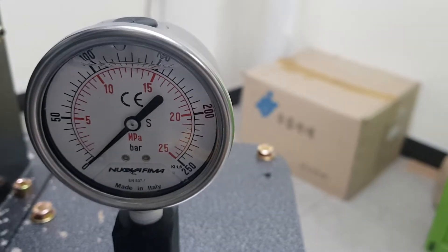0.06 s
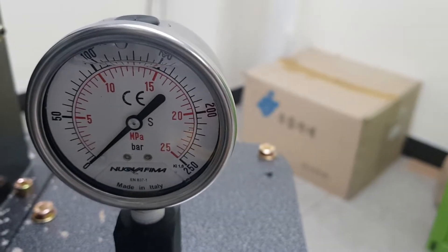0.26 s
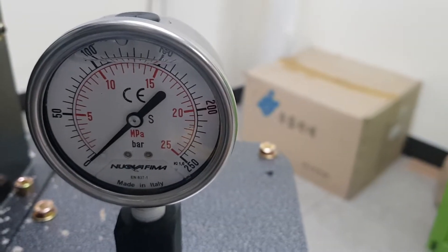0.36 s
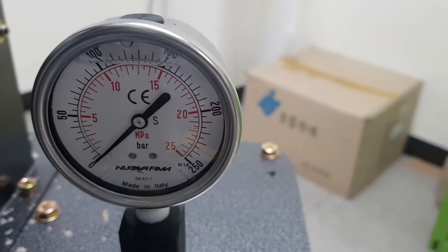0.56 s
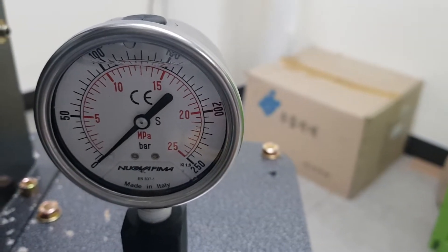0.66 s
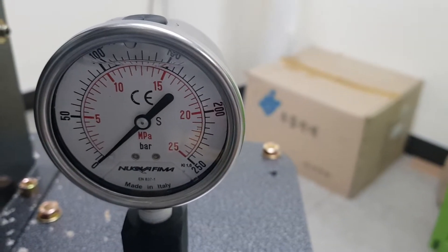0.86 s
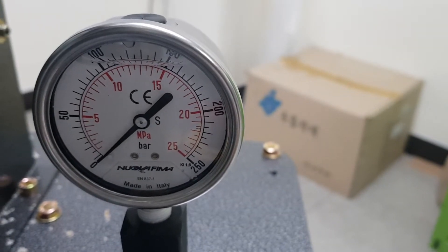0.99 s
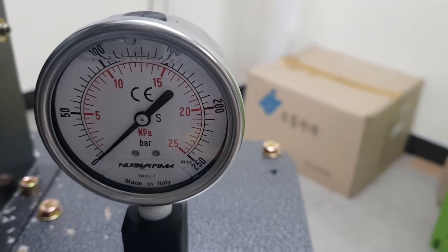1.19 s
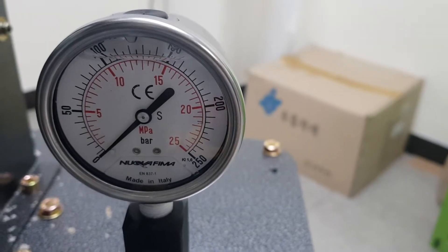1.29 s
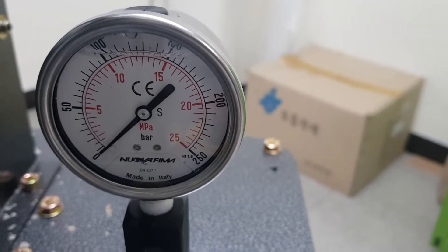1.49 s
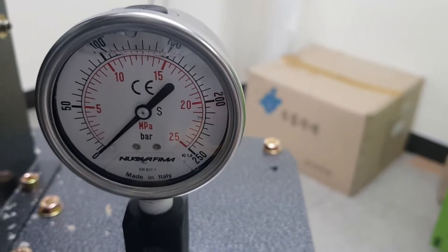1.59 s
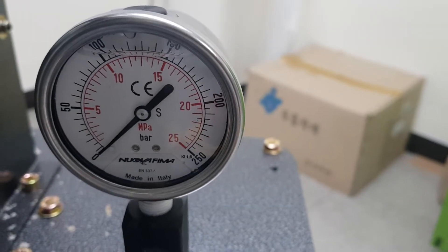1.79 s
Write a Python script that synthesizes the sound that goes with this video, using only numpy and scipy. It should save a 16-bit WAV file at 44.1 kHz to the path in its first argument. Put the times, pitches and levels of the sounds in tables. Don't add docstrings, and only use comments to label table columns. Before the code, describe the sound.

Close up indoors, sharp metallic clacks from a small hydraulic machine: a ringing bang, a boomy return with loose rattle, a dry snap, then a clunk, over faint pump whine and room hum.

```python
import sys
import numpy as np
from scipy import signal
from scipy.fft import rfft, irfft, next_fast_len
from scipy.io import wavfile
from scipy.ndimage import uniform_filter1d, map_coordinates

SR = 44100
rng = np.random.default_rng(int(sys.argv[2]) if len(sys.argv) > 2 else 0)


def volts_from_decibels(level):
    exponent = np.asarray(level, float) / 20
    return 10 ** exponent


def file_out(sig):
    cols = np.atleast_2d(sig).T
    lim = np.clip(cols, -1, 1)
    pcm = np.round(lim * 32767).astype(np.int16)
    wavfile.write(sys.argv[1], SR, pcm)


N = 81585
TIME = np.arange(N) / SR
SIDE = np.array([[.5], [-.5]])


def unit(x):
    return x / np.sqrt(np.mean(x ** 2) + 1e-20)


def along(points, hz):
    f, v = np.transpose(points)
    return np.interp(np.log(hz + 1), np.log(f + 1), v)


def wobble(rate_hz):
    knots = rng.standard_normal(int(N * rate_hz / SR) + 4)
    return map_coordinates(knots, [TIME * rate_hz])


def filtered(x, response):
    m = next_fast_len(x.shape[-1] + 8192)
    spectrum = rfft(x, m) * response(np.fft.rfftfreq(m, 1 / SR))
    return irfft(spectrum, m)[..., :x.shape[-1]]


# frequency_hz, likeness
LIKENESS = [(25, 0.29), (150, 0.89), (300, 1), (600, 0.84), (2000, 0.075)]


def pair(n):
    def mid_and_side(hz):
        angle = np.arccos(np.clip(along(LIKENESS, hz), -1, 1)) / 2
        return np.array([np.cos(angle), np.sin(angle)])

    mid, side = filtered(rng.standard_normal((2, n)), mid_and_side)
    return np.array([mid + side, mid - side])


def struck(contacts, tone, ring, ring_db, blow_db, pan_db):
    rise_s, grain_db = .001, 2
    shape = np.zeros(N)
    for start_s, level_db, clatter_s, t60_s in contacts:
        dying = np.clip(TIME - start_s - clatter_s, 0, 1) / t60_s
        shape += volts_from_decibels(level_db - 60 * dying) * np.clip((TIME - start_s) / rise_s, 0, 1)
    impacts = shape * unit(pair(N) * volts_from_decibels(grain_db * wobble(900)))
    for start_s, level_db, _, _ in contacts:
        impacts[:, round((start_s + rise_s) * SR)] += volts_from_decibels(level_db + blow_db)

    def body(f):
        rung = 0
        for k, (hz, width, db) in enumerate(ring):
            resonance = 1j * f * width / (hz * hz - f * f + 1j * f * width)
            rung = rung + volts_from_decibels(db) * resonance * (-1) ** k
        return volts_from_decibels(along(tone, f)) + volts_from_decibels(ring_db) * rung

    body_rms = np.sqrt(np.mean(np.abs(body(np.arange(1, SR // 2, 8))) ** 2))
    return volts_from_decibels(pan_db * SIDE) * filtered(impacts, body) / body_rms


# start_s, level_db, clatter_s, t60_s
THROW_HITS = [
    (.279, -30, 0.02, 0.11),
    (.290, -10, 0.012, 0.21),
]
# frequency_hz, level_db
THROW_COLOUR = [(30, -42), (150, -13.5), (520, -12), (1150, -4), (2800, -17), (7500, -22), (12700, -22),
                (16600, -28)]
# pitch_hz, width_hz, level_db
THROW_MODES = [(670, 25, -2.5), (928, 20, 4.5), (1296, 27, 2.5), (1560, 27, -1), (2070, 100, -8.5),
               (4550, 45, -7), (6580, 70, -31), (9450, 34, -9), (11300, 110, -22), (12300, 130, -8),
               (13530, 60, -23)]


def lever_throw():
    return struck(THROW_HITS, THROW_COLOUR, THROW_MODES, ring_db=-1.0, blow_db=19.0, pan_db=0.72)


# start_s, level_db, clatter_s, t60_s
RETURN_HITS = [
    (.4915, -26, 0.0027, 0.037),
    (.4945, -13.5, 0.02, 0.13),
]
# frequency_hz, level_db
RETURN_COLOUR = [(30, -45), (300, -8.5), (1500, -10), (5000, -20.5), (7200, -27.5), (12400, -18.5),
                 (16600, -34)]
# pitch_hz, width_hz, level_db
RETURN_MODES = [(680, 30, -2), (1097, 31, 2.5), (1392, 63, -7.5), (1977, 71, 0.5), (3750, 91, -7),
                (5700, 60, -6.5), (8900, 26, -29), (10900, 110, -27), (11050, 80, -15), (13200, 150, -6),
                (13260, 60, -23)]


def lever_return():
    return struck(RETURN_HITS, RETURN_COLOUR, RETURN_MODES, ring_db=-1.5, blow_db=18, pan_db=-0.39)


# start_s, level_db, clatter_s, t60_s
SLIDE_HITS = [
    (.545, -29.5, 0.013, 0.089),
    (.572, -26.5, .008, 0.067),
    (.587, -22, 0.0034, 0.04),
    (.595, -25, .005, 0.075),
    (.6215, -22.5, .008, 0.067),
    (.645, -29.5, 0.014, 0.1),
    (.672, -35.5, 0.0053, 0.092),
]
# frequency_hz, level_db
SLIDE_COLOUR = [(30, -45), (150, -2), (700, -7.5), (2400, -3.5), (3600, -11.5), (9000, -18.5),
                (13000, -19.5), (16600, -30)]
# pitch_hz, width_hz, level_db
SLIDE_MODES = [(730, 180, 2.5), (1540, 120, -15), (2410, 170, -5.5), (3100, 200, -4), (4050, 210, -11)]


def slide():
    return struck(SLIDE_HITS, SLIDE_COLOUR, SLIDE_MODES, ring_db=-5.5, blow_db=6, pan_db=0.35)


# start_s, level_db, clatter_s, t60_s
SHUT_HITS = [
    (1.4545, -13.5, 0.0059, 0.15),
    (1.505, -28.5, 0.004, 0.079),
]
# frequency_hz, level_db
SHUT_COLOUR = [(30, -22), (450, -4), (1200, -7.5), (3000, -7.5), (7000, -18), (13000, -23.5),
               (16600, -14.5)]
# pitch_hz, width_hz, level_db
SHUT_MODES = [(320, 20, -10.5), (564, 68, 1.5), (1700, 79, -2), (2270, 120, 1.5), (3390, 100, -13),
              (4060, 130, -3.5), (4780, 100, -17), (11700, 120, -8.5)]


def valve_shut():
    return struck(SHUT_HITS, SHUT_COLOUR, SHUT_MODES, ring_db=0.5, blow_db=10.5, pan_db=0.5)


# start_s, level_db, clatter_s, t60_s
CATCH_HITS = [
    (.169, -47, 0.016, .1),
    (1.109, -32, 0.0031, 0.13),
    (1.075, -36, 0.0036, .06),
    (1.215, -52, .004, 0.054),
    (1.299, -30.5, 0.0037, 0.042),
    (1.335, -38, 0.007, 0.065),
]
SNAP_HITS = [
    (1.1485, -25, 0.0026, 0.027),
    (1.1528, -10, 0.0022, 0.012),
    (1.157, -22.5, 0.0044, 0.034),
    (1.164, -26, 0.0056, 0.067),
]
# frequency_hz, level_db
CATCH_COLOUR = [(30, -59), (900, -10), (2200, -4), (5500, -17), (9000, -20.5), (16600, -23)]
SNAP_COLOUR = [(30, -48), (250, -10), (900, -13.5), (2300, -3), (4200, -14), (6500, -13), (10000, -19.5),
               (16600, -23)]
# pitch_hz, width_hz, level_db
CATCH_MODES = [(681, 42, -1.5), (1116, 36, 4), (2090, 170, -2.5), (2425, 69, 0.5), (3120, 26, -2),
               (5090, 88, 0), (6030, 150, -11.5), (7070, 300, -7.5)]


def catch():
    ticks = struck(CATCH_HITS, CATCH_COLOUR, CATCH_MODES, ring_db=-0.5, blow_db=16, pan_db=-.6)
    snap = struck(SNAP_HITS, SNAP_COLOUR, CATCH_MODES, ring_db=2.5, blow_db=8, pan_db=0.94)
    return ticks + snap


# start_s, level_db, clatter_s, t60_s
SCRAPE_HITS = [
    (.188, -42, 0.0037, 0.029),
    (.279, -33, 0.0048, .03),
    (.587, -41, 0.0024, 0.02),
    (1.442, -25, 0.019, 0.059),
]
# frequency_hz, level_db
SCRAPE_COLOUR = [(50, -70), (2200, 2.5), (7200, -9), (13300, -1), (16600, -11)]


def scrape():
    return struck(SCRAPE_HITS, SCRAPE_COLOUR, [], ring_db=0, blow_db=-3, pan_db=-.6)


def swelling_tones(tones):
    out = np.zeros(N)
    for start_s, pitch_hz, level_db, swell_s, t60_s in tones:
        t = np.clip(TIME - start_s, 0, None)
        level = volts_from_decibels(level_db - 60 * t / t60_s + 2.5 * wobble(44.1))
        swell = 1 - np.exp(-(t / swell_s) ** 2)
        out += level * swell * np.sin(2 * np.pi * pitch_hz * t)
    return out


# start_s, pitch_hz, level_db, swell_s, t60_s
BAR_TONES = [(.291, 922, -17, 0.0034, .3), (.293, 1276, -22, 0.0068, .15), (.36, 374, -35, .03, 1.2),
             (.305, 133, -24.5, 0.0095, 0.12), (.4912, 540, -20, 0.0005, 0.022),
             (.495, 1375, -12, 0.0026, 0.086), (.498, 1097, -20, 0.007, 0.14),
             (.582, 810, -18, 0.0044, 0.065), (.622, 1163, -24, 0.0025, 0.091), (.65, 840, -31, .003, .07),
             (1.09, 113.5, -32, 0.043, 0.37), (1.153, 686, -24, 0.0026, 0.061),
             (1.155, 1079, -28.5, 0.0053, 0.2), (1.154, 2070, -29, .0015, 0.041),
             (1.155, 358, -33, 0.0043, .2), (1.155, 474, -33, .004, 0.17), (1.157, 571, -36, 0.0048, 0.18),
             (1.298, 594, -32, .004, 0.11), (1.455, 326, -17, 0.002, 0.12), (1.456, 1633, -22, .002, .09),
             (1.456, 2020, -22, .0015, .05), (1.462, 3340, -27, .004, .08), (1.505, 1940, -22, .002, .045),
             (1.511, 338, -27, 0.0025, .07), (1.51, 3360, -31, .003, .08), (1.522, 780, -28, .003, .06)]


def linkage_bars():
    return swelling_tones(BAR_TONES)


# start_s, pitch_hz, level_db, swell_s, t60_s
MORE_TONES = [(.13, 239.4, -40, 0.036, 0.82), (.295, 74, -29, 0.017, .25), (0.31, 213, -23.5, 0.016, 0.14),
              (0.331, 345, -26, 0.02, 0.3), (.503, 255.2, -9, 0.019, 0.15), (0.504, 220, -23, 0.05, 0.1),
              (0.564, 263, -18.5, 0.005, 0.084), (0.576, 115, -27, 0.0083, 0.092),
              (0.613, 110.3, -17.5, 0.012, 0.15), (0.671, 85.2, -30, 0.042, 0.36),
              (1.17, 227, -32.5, 0.0079, 0.3), (1.4543, 542, -20.5, 0.0031, 0.059),
              (1.456, 170, -35, 0.0049, 0.13), (1.492, 73, -32.5, 0.024, 0.26)]


def more_struck_tones():
    return swelling_tones(MORE_TONES)


LOAD_S, LOAD_RISE_S = 1.5, .06


def pump_load():
    return np.clip((TIME - LOAD_S) / LOAD_RISE_S, 0, 1)


def tooth_phase():
    idle_hz, loaded_hz = 383, 381.8
    return 2 * np.pi * np.cumsum(idle_hz + (loaded_hz - idle_hz) * pump_load()) / SR


# order, idle_db, loaded_db, left_over_right_db, left_lead_rad
TOOTH_HARMONICS = [(1, -59, -54, 6.5, 0.75), (2, -53.5, -43, -1, 1.45), (3, -50, -51, 2.5, -0.17),
                   (4, -56.5, -52, -14, 2.1), (5, -56, -42.5, -13, -1.56), (6, -55, -51.5, -12, 1.1),
                   (7, -54.5, -58, -11, -0.59), (11, -57, -47.5, -12.5, 1.45), (17, -65, -56, 9, -1.3)]


def pump():
    load, phase = pump_load(), tooth_phase()
    swell_db = 10 * load * (TIME - TIME[-1]) / (TIME[-1] - LOAD_S)
    out = np.zeros((2, N))
    for order, idle_db, loaded_db, pan_db, lead in TOOTH_HARMONICS:
        level = idle_db + (loaded_db - idle_db) * load + pan_db * SIDE
        level = level + (order > 4) * swell_db + 2.3 * wobble(7.04) + 2.36 * wobble(35)
        angle = order * phase + lead * SIDE + 0.3 * wobble(20) + rng.uniform(0, 2 * np.pi)
        out += volts_from_decibels(level) * np.sqrt(2) * np.sin(angle)
    return out


def lever_buzz():
    level_db, free_s, grows_db, t60_s = -32, 0.36, 3, 1.4
    level = level_db + grows_db * np.clip(TIME / 0.23 - 1, -1, 0) + 1.06 * wobble(13.0) + 1.5 * wobble(27.7)
    level = level - 60 * np.clip(TIME - free_s, 0, 2) / t60_s
    return volts_from_decibels(level) * np.sin(2 * tooth_phase() + 1.58 * SIDE)


def drone(level, tone, patchy_db):
    z = signal.stft(pair(N + 512), nperseg=512)[2]
    patches = uniform_filter1d(rng.standard_normal(z.shape[1:]), size=5, axis=0)
    patches = uniform_filter1d(patches, size=10, axis=1)
    noise = signal.istft(z * volts_from_decibels(patchy_db * unit(patches)), nperseg=512)[1][:, :N]
    coloured = unit(filtered(noise, lambda hz: volts_from_decibels(along(tone, hz))))
    return volts_from_decibels(np.interp(TIME, *np.transpose(level))) * coloured


# time_s, level_db
OIL_LEVEL = [(0, -76), (1.45, -85), (1.55, -48.5), (1.85, -46)]
# frequency_hz, level_db
OIL_COLOUR = [(3000, -23), (9000, -2), (14500, -3), (16600, -6.5)]


def oil():
    return drone(OIL_LEVEL, OIL_COLOUR, patchy_db=2.0)


# time_s, level_db
HUM_LEVEL = [(0, -39), (.2, -32.5), (.27, -31.5), (.45, -29.5), (.65, -29.5), (.8, -39.5), (1.05, -37.5),
             (1.2, -38.5), (1.42, -40), (1.55, -38.5), (1.85, -40)]
# frequency_hz, level_db
HUM_COLOUR = [(15, -32), (90, -3), (170, -7.5), (330, -4), (500, -9), (750, -6), (2300, -7.5),
              (3300, -18.5), (6000, -31.5)]


def motor_hum():
    return drone(HUM_LEVEL, HUM_COLOUR, patchy_db=1.15)


# time_s, level_db
HISS_LEVEL = [(0, -49.5), (.3, -41.5), (.65, -37), (.75, -46), (1.05, -46), (1.2, -46.5), (1.42, -47),
              (1.55, -44.5), (1.85, -43.5)]
# frequency_hz, level_db
HISS_COLOUR = [(1500, -48), (3000, -6.5), (4500, -3), (6500, -9.5), (8000, -18.5), (11600, -14.5),
               (13500, -36), (16600, -40)]


def hiss():
    return drone(HISS_LEVEL, HISS_COLOUR, patchy_db=2.0)


# frequency_hz, t60_s
ROOM_DECAY = [(100, 0.96), (1000, 0.81), (4000, 0.79), (12000, 0.59)]


def room(x):
    hz, t, z = signal.stft(pair(SR), SR, nperseg=256)
    decay = volts_from_decibels(-60 * t / along(ROOM_DECAY, hz)[:, None])
    tail = signal.istft(z * decay, SR, nperseg=256)[1]
    tail = tail / np.linalg.norm(tail[0])
    delayed = np.pad(x, (300, 0))[None]
    return volts_from_decibels(-12) * signal.fftconvolve(delayed, tail, axes=1)[:, :N]


# frequency_hz, left_over_right_db
PORT_BALANCE = [(60, 4), (240, 6.5), (950, -0.5), (3770, -3), (15000, 0)]


def scene():
    blows = lever_throw() + lever_return() + slide() + valve_shut() + catch() + scrape()
    blows = blows + linkage_bars() + more_struck_tones()
    near = blows + oil() + motor_hum() + hiss()

    def ports(hz):
        left_leads_s = 0.0002623
        return volts_from_decibels(SIDE * along(PORT_BALANCE, hz)) * np.exp(2j * np.pi * hz * SIDE * left_leads_s)

    return filtered(near + room(blows[0]), ports) + pump() + lever_buzz()


def band_limit(x):
    return signal.sosfilt(signal.butter(12, 16640, fs=SR, output="sos"), x)


# frequency_hz, level_db
TOP_ROLL_OFF = [(15700, 0), (15950, -32), (16600, -38), (16650, -120)]


def record(dry):
    ceiling = .95
    held = dry / (1 + np.abs(dry / ceiling) ** 4) ** (1 / 4)
    finished = filtered(held, lambda hz: volts_from_decibels(along(TOP_ROLL_OFF, hz)))
    return band_limit(finished)


dry = scene()
out = record(dry)
file_out(out)
```